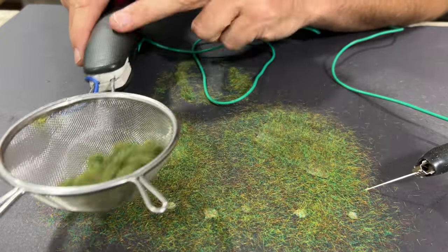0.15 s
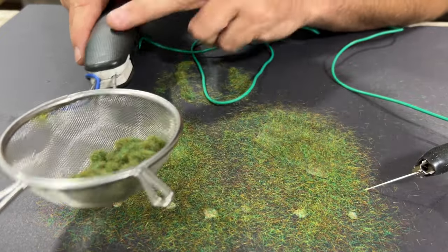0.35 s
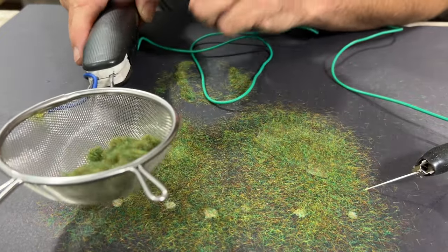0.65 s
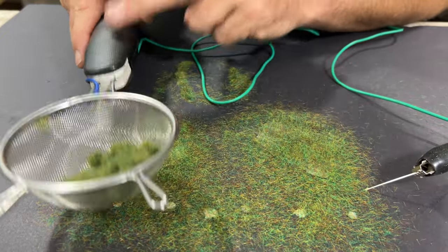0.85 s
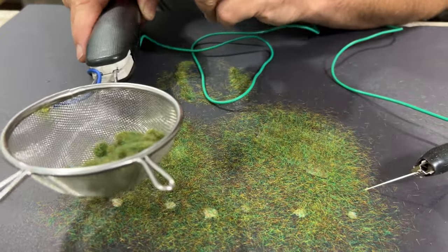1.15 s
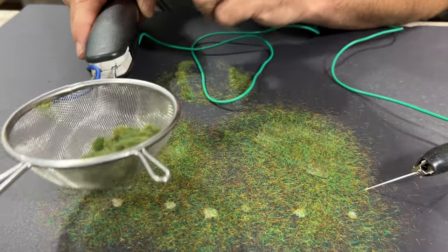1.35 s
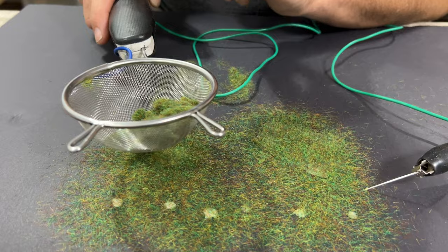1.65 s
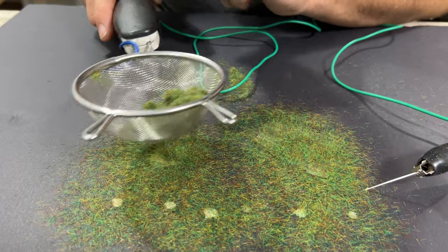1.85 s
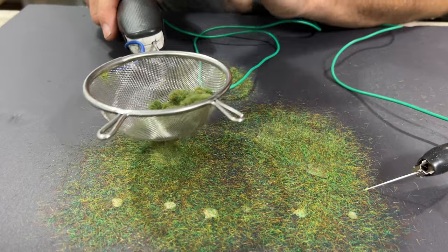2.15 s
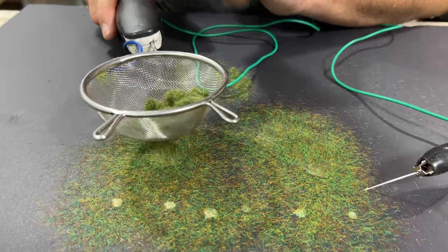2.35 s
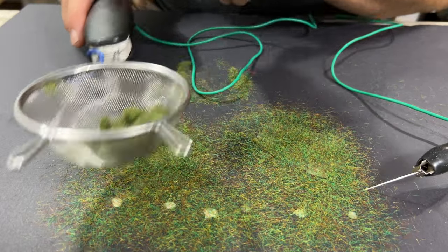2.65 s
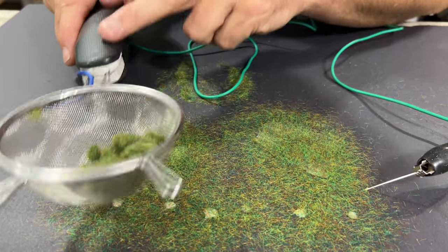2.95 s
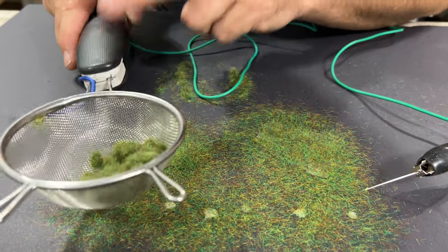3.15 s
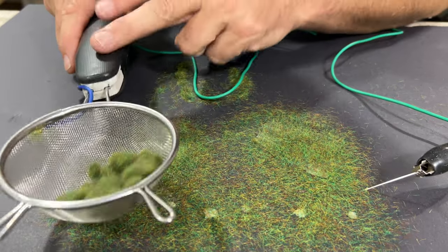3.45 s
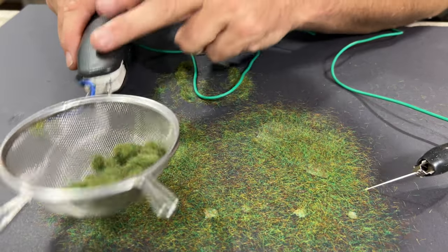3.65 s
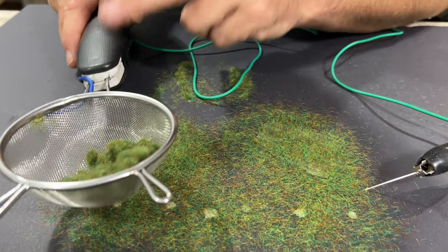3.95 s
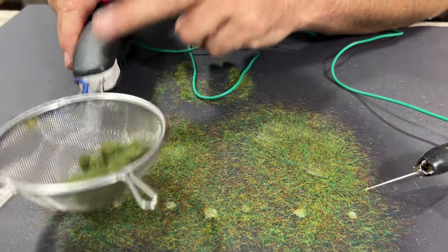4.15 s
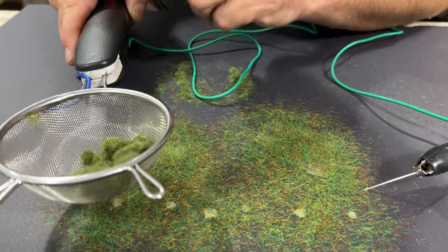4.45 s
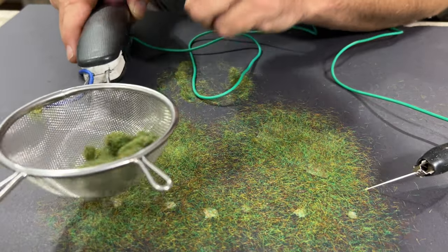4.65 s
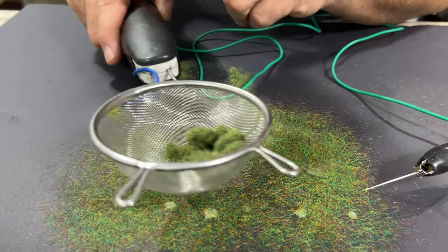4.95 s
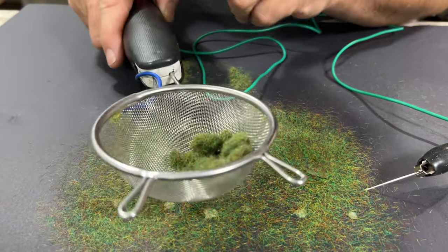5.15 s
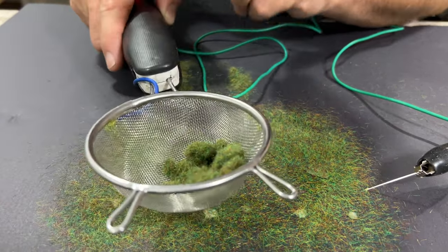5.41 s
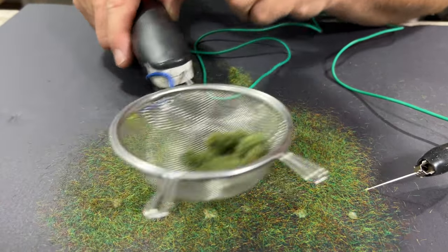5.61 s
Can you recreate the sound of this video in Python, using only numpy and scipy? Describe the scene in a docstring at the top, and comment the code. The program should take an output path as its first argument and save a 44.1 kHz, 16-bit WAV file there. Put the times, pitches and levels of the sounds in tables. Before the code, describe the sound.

Close up in a small room with low rumble and faint hum, fibres scratch briefly over wire mesh and a grip scuffs. Fingers then tap a strainer's handle about five times a second, each tap a bright click with a dull knock and soft low boom, often answered by a plastic clack. Pauses bring fibre slides, then tapping resumes, more tightly paired with clacks, and ends with a strong swish and a few sparser taps.

```python
"""Fibres slide and scratch over a wire mesh first, above low room rumble, a faint hum and a whine.
Then a scuff, and finger taps on the handle of a mesh strainer full of model-grass fibres, over a workbench.
Each tap mixes a bright noise snap, a rim ping, a body-ringing knock and a late low boom of the bench.
Decaying modes make the handle clack back; stray wire ticks are short noise bursts.
Each tap or clack jolts fibres loose: grainy noise rubs and hisses, and swells again in separate slides."""
import sys
import numpy as np
from scipy import signal
from scipy.fft import rfft, irfft, next_fast_len
from scipy.io import wavfile
from scipy.ndimage import map_coordinates

SR = 44100
rng = np.random.default_rng(int(sys.argv[2]) if len(sys.argv) > 2 else 0)


def to_wav(s):
    """Save 16-bit WAV."""
    ch = np.atleast_2d(s).T  # columns
    pcm = np.round(np.clip(ch, -1, 1) * 32767)  # PCM
    wavfile.write(sys.argv[1], SR, pcm.astype(np.int16))


N = 254898  # length in samples

# Spectrum of the low room rumble: pitch_hz, level_db (relative, per Hz)
RUMBLE_SPECTRUM = [(15, -31), (35, 1.5), (48, -0.5), (64, 0.5), (100, 0.5), (135, -4), (200, -11),
                   (400, -21.5), (700, -35), (1500, -36), (4000, -56.5), (16000, -43)]
# Mains hum and electronic whine: pitch_hz, level_db (rms), phase_wander_rad
HUM_TONES = [(119.9, -62, 0.44), (13797, -76, 2.5)]
# Room decay: pitch_hz, t60_s
ROOM_DECAY = [(150, 0.41), (600, 0.23), (2000, 0.31), (5000, 0.34), (14000, 0.26)]
# Likeness of left and right: pitch_hz, likeness (0 unrelated to 1 identical)
STEREO_LIKENESS = [(60, 0.98), (130, 0.73), (300, 0.74), (700, 0.038), (2000, 0.048), (4000, 0.28),
                   (5800, 0.079), (7500, 0.72), (10000, 1), (11500, 1), (13500, 0.8), (15500, .75)]
# Phase by which left leads right: pitch_hz, lead_rad
LEFT_LEAD = [(500, 0), (3000, .7), (5000, .8), (6900, 0), (8200, -1.1), (10100, -3.14), (13400, -6.28),
             (14300, -6.8), (15800, -8.5)]
# Resonances of strainer and handle: pitch_hz, width_hz, level_db (over the plain sound)
BODY_RESONANCES = [(355, 110, -8.5), (489, 23, -6.5), (535, 15, -5), (720, 22, 6.5), (825, 10, 3),
                   (963, 41, 3.5), (1064, 15.6, 7), (1220, 15, -8), (1335, 29, -2), (1640, 8.3, -31),
                   (2510, 110, -0.5), (3460, 52, 1), (3700, 15, 4), (4450, 23, -9), (5300, 15, 7)]

# Scuffs as the grip shifts on the handle: crest_s, rise_s, level_db
SCUFFS_ON_HANDLE = [(.14, 0.033, -52.5), (0.228, 0.016, -34.5)]
# Colouring of the scuffs: pitch_hz, level_db (relative, per Hz)
SCUFF_SPECTRUM = [(100, 0), (280, -7), (480, 1.5), (700, -10.5), (1150, 0), (1900, -3), (3000, -8),
                  (3900, -4), (6000, -5), (8500, -14), (11000, -27), (16000, -27)]
# Fibre clumps scratching over the wire: crest_s, half_length_s, level_db
CLUMP_SCRATCHES = [(0.029, 0.0099, -59), (2.585, 0.015, -52.5), (2.669, 0.011, -55), (4.706, 0.0096, -55),
                   (4.761, .016, -50), (4.802, 0.024, -46), (4.857, 0.027, -54), (5.665, 0.024, -57)]
# Colouring of the scratches: pitch_hz, level_db (relative, per Hz)
SCRATCH_SPECTRUM = [(1000, -30), (2200, -25), (2480, 2.5), (2900, -14), (3700, 2), (4500, 6), (5200, -26),
                    (8000, -1), (12000, -36)]
# Fibres sliding as the sieve tilts: crest_s, rise_s, fall_s, rub_db, hiss_db
FIBRE_SLIDES = [(.035, 0.042, 0.051, -55.5, -63), (1.47, 0.095, 0.14, -59.5, -59),
                (1.70, 0.079, 0.06, -53.5, -49), (2.555, 0.062, 0.14, -52.5, -55),
                (2.88, 0.068, 0.08, -58.5, -55), (2.939, 0.04, 0.044, -52.5, -64),
                (3.57, .04, 0.022, -74, -64), (4.801, 0.047, 0.092, -46, -51),
                (4.89, 0.075, 0.11, -50.5, -48), (5.13, 0.028, 0.048, -57, -64),
                (5.31, 0.018, 0.018, -62, -73), (5.67, 0.038, 0.13, -49.5, -50)]
# Colouring of fibres rubbing on the mesh: pitch_hz, level_db (relative, per Hz)
RUB_SPECTRUM = [(100, -34), (300, -2), (520, 1.5), (900, -6.5), (1500, -9), (2100, -2.5), (2480, -5),
                (3000, -3), (3750, -0.5), (4500, 1.5), (6000, -5), (8500, -5), (12000, -24)]
# Colouring of the fine fibre hiss: pitch_hz, level_db (relative, per Hz)
HISS_SPECTRUM = [(1500, -9), (4000, -19.5), (6500, -3.5), (8500, -3), (11500, 2), (13500, -1), (16000, -5)]

# Stray ticks of the wire: start_s, level_db (near the dry peak)
WIRE_TICKS = [(.0495, -44), (0.278, -41), (0.9402, -34.5), (1.0025, -38.5), (1.229, -42.5), (1.902, -39),
              (2.117, -43.5), (2.382, -38.5), (2.529, -26.5), (3.1153, -51), (4.2512, -41.5), (4.537, -45),
              (4.7455, -35.5), (5.3616, -43)]
# Spectrum of a bright dry contact: pitch_hz, level_db (relative, per Hz)
SNAP_SPECTRUM = [(500, -14), (2000, -11), (4000, -2.5), (7000, -1), (10000, 8.5), (13000, 3.5),
                 (16000, 3.5)]
# Modes of the steel rim: pitch_hz, level_db (relative), t60_s
RIM_MODES = [(8000, 0, .005), (13200, -15, .003)]
# The handle clacking back: start_s, level_db (dry peak of the plastic clack)
HANDLE_CLACKS = [(.2386, -29.5), (0.3813, -26.5), (0.8285, -37.5), (0.9108, -27), (1.0495, -28),
                 (1.2662, -31), (2.3027, -26.5), (2.8377, -44), (3.0608, -33), (3.2855, -43),
                 (3.523, -39.5), (3.7531, -30), (3.9778, -30), (4.1943, -30), (4.4179, -32),
                 (4.6415, -27.5), (4.705, -38.5)]
# Modes of the plastic clack: pitch_hz, level_db (relative), t60_s
PLASTIC_MODES = [(2470, -10, 0.0088), (3865, 2, 0.0058), (4393, 2, 0.0053), (5790, -1.5, 0.0023)]
# Spectrum of the hollow rattle: pitch_hz, level_db (relative, per Hz)
RATTLE_SPECTRUM = [(100, -9), (400, 7.5), (900, 3), (1500, -3), (2200, -5), (4000, -6), (6000, -11.5),
                   (9000, -12.5), (16000, -14.5)]
# Finger taps: start_s, snap_db, ping_db, knock_db, boom_db
FINGER_TAPS = [(0.149, -37.5, -51.5, -52, -33.5), (.37, -34.5, -52.5, -57, -40.5),
               (.5855, -37.5, -49, -54, -37), (0.8041, -35, -60.5, -47, -31.5),
               (1.0326, -41, -56.5, -52, -33), (1.249, -34, -59, -48, -31.5),
               (1.7707, -30.5, -53, -48.5, -35), (1.9821, -31, -36.5, -45, -32),
               (2.2085, -29, -30, -45, -32.5), (2.42, -30, -31, -50.5, -32), (3.0394, -43, -62.5, -66, -68),
               (3.2036, -41.5, -48, -58.5, -56), (3.4422, -34.5, -64.5, -53, -42.5),
               (3.6666, -33, -62, -53, -42), (3.8844, -34, -62.5, -49.5, -36.5),
               (4.1081, -35.5, -65, -54.5, -36), (4.3282, -37.5, -67, -55.5, -37),
               (4.5529, -38.5, -59, -53, -37.5), (5.042, -33, -58, -55, -51), (5.095, -57, -51, -62, -39.5),
               (5.2626, -34.5, -48, -53.5, -41), (5.5088, -28.5, -46, -49.5, -38.5)]
# Spectrum of the handle knock: pitch_hz, level_db (relative, per Hz)
KNOCK_SPECTRUM = [(60, -12), (180, 0.5), (330, 4.5), (550, 4), (850, -10.5), (1300, -8.5), (1900, -9.5),
                  (3500, -20.5), (8000, -25.5), (16000, -15)]

TOP_HZ = 15850  # upper band limit
SCUFF_FADE_DB_PER_S = 192
SWELL_SHAPE = 2.18  # 2 is a bell curve; lower gives longer skirts
REST_RUB_DB, REST_HISS_DB = -74.5, -70  # the trickle in between
JOLT_RISE_S, JOLT_RUB_DB, JOLT_HISS_DB = 0.01, -67, -63.5  # fibres jolted loose by one blow
RUB_FADE_DB_PER_S, HISS_FADE_DB_PER_S = 102, 30.5  # hiss sifts on longer than rub
EDGE_DB, RIM_DB, RATTLE_DB = -6.5, -14.5, -18  # relative to their clack
THUD_DB = -11  # the bench's upper mode, relative to its boom


def amp(db):
    """Decibels to gain."""
    return 10 ** (np.asarray(db) / 20)


def unit(x):
    """Scale to rms 1."""
    return x / np.sqrt(np.mean(x ** 2) + 1e-20)


def along(points, hz):
    """Read a curve of (Hz, value) points on a log frequency axis."""
    point_hz, values = np.transpose(points)
    return np.interp(np.log(hz + 1), np.log(point_hz + 1), values)


def wobble(rate):
    """A smooth random curve with rate knots a second."""
    knots = rng.standard_normal(int(N * rate / SR) + 4)
    return map_coordinates(knots, [np.arange(N) * rate / SR])


def filtered(x, response):
    """Shape a sound by a function of frequency."""
    n = x.shape[-1]
    padded = next_fast_len(n + 4096)
    spectrum = rfft(x, padded) * response(np.fft.rfftfreq(padded, 1 / SR))
    return irfft(spectrum, padded)[..., :n]


def coloured(x, spectrum):
    """Equalise a sound by a spectrum table, then set it to rms 1."""
    return unit(filtered(x, lambda hz: amp(along(spectrum, hz))))


def spread(pair):
    """Blend two unrelated signals into a partly alike left and right."""
    def shares(hz):
        turn = np.arccos(np.clip(along(STEREO_LIKENESS, hz), -1, 1)) / 2
        return np.array([np.cos(turn), np.sin(turn)])

    common, apart = filtered(pair, shares)
    return np.array([common + apart, common - apart])


def add(track, s, sound):
    """Mix a sound into a track at a time in seconds."""
    part = track[..., max(round(s * SR), 0):][..., :sound.shape[-1]]
    part += sound[..., :part.shape[-1]]


def swell(s, rise, fall):
    """A rounded swell of height 1 with its crest at s."""
    t = np.arange(N) / SR - s
    return np.exp(-np.abs(t / np.where(t < 0, rise, fall)) ** SWELL_SHAPE)


def surge(s, rise, fade_db_per_s):
    """A quick rise to 1 at s, then a steady fade in decibels."""
    t = np.arange(N) / SR - s
    return np.exp(-(np.minimum(t, 0) / rise) ** 2) * amp(-fade_db_per_s * np.maximum(t, 0))


def burst(spectrum, attack, t60):
    """Half a second of coloured noise with a fast onset and an exponential decay."""
    t = np.arange(SR // 2) / SR
    noise = coloured(rng.standard_normal(len(t)), spectrum)
    return noise * amp(-60 * t / t60) * (1 - np.exp(-t / attack))


def ring(modes, attack, scatter_db, detune):
    """One blow on decaying sine modes, with strengths and pitches drawn anew; peak 1."""
    t = np.arange(SR // 2) / SR
    sound = np.zeros(len(t))
    for hz, db, t60 in modes:
        decay = amp(db + scatter_db * rng.normal() - 60 * t / t60)
        sound += decay * np.sin(2 * np.pi * hz * (1 + detune * rng.normal()) * t)
    sound = sound * (1 - np.exp(-(t / attack) ** 2))
    return sound / np.abs(sound).max()


def in_room(sound, wet_db):
    """Give a short sound its own stereo tail of noise, decaying at a different pace in each band."""
    noise = rng.standard_normal((2, SR // 2))
    hz, t, bands = signal.stft(noise, SR, nperseg=256)
    decay = amp(-60 * t / along(ROOM_DECAY, hz)[:, None])
    tail = spread(signal.istft(bands * decay, SR, nperseg=256)[1])
    tail = tail / np.linalg.norm(tail[0])
    wet = signal.fftconvolve(sound[None], tail, axes=1)[:, :len(sound)]
    return sound + amp(wet_db) * wet


def grains(rate, size_db, smooth):
    """Stereo crackle: random tiny contacts of uneven size over a smooth share of noise."""
    sizes = amp(size_db * rng.uniform(-0.47, 1, N))
    contacts = (rng.random(N) < rate / SR) * sizes
    crackle = unit(contacts * rng.standard_normal((2, N)))
    return spread(crackle + smooth * rng.standard_normal((2, N)))


def body(hz):
    """The strainer passes every frequency and adds its resonances on top."""
    response = 1
    for centre, width, db in BODY_RESONANCES:
        damping = 1j * hz * width
        response = response + amp(db) * damping / (centre * centre - hz * hz + damping)
    return response


def background():
    """Gently wavering low-room noise under two sine tones of wandering phase."""
    t = np.arange(N) / SR
    noise = spread(rng.standard_normal((2, N)))
    bed = amp(-50.5 + 1.5 * wobble(5.3)) * coloured(noise, RUMBLE_SPECTRUM)
    for hz, db, wander in HUM_TONES:
        bed = bed + amp(db) * np.sqrt(2) * np.sin(2 * np.pi * hz * t + wander * wobble(20))
    return bed


def scuff():
    """The grip scrapes the handle: coarse grit rings the body and follows short surges."""
    pressure = sum(amp(db) * surge(s, rise, SCUFF_FADE_DB_PER_S) for s, rise, db in SCUFFS_ON_HANDLE)
    grit = filtered(grains(rate=2500, size_db=7, smooth=1.0), body)
    return pressure * amp(1.2 * wobble(126.3)) * coloured(grit, SCUFF_SPECTRUM)


def scratches():
    """Clumps catch and slip on the weave: flickering grit rings the body in little surges."""
    t = np.arange(N) / SR
    pressure = sum(amp(db) * np.exp(-((t - s) / half) ** 2) for s, half, db in CLUMP_SCRATCHES)
    catching = amp(2.5 * wobble(160))
    grit = filtered(grains(rate=1500, size_db=1, smooth=0.21), body)
    return pressure * catching * coloured(grit, SCRATCH_SPECTRUM)


def jolted(fade_db_per_s):
    """Summed power of fibres set moving by all taps and clacks; each fresh jolt peaks at 1."""
    power = np.zeros(N)
    one = surge(JOLT_RISE_S, JOLT_RISE_S, fade_db_per_s) ** 2
    for s, *_ in FINGER_TAPS + HANDLE_CLACKS:
        add(power, s, one)
    return power


def fibres():
    """Tiny contacts rub the ringing mesh and hiss through it; trickle, jolts and slides add in power."""
    rub_power = amp(REST_RUB_DB) ** 2 + amp(JOLT_RUB_DB) ** 2 * jolted(RUB_FADE_DB_PER_S)
    hiss_power = amp(REST_HISS_DB) ** 2 + amp(JOLT_HISS_DB) ** 2 * jolted(HISS_FADE_DB_PER_S)
    for s, rise, fall, rub_db, hiss_db in FIBRE_SLIDES:
        flow = swell(s, rise, fall)
        rub_power = rub_power + (amp(rub_db) * flow) ** 2
        hiss_power = hiss_power + (amp(hiss_db) * flow) ** 2
    rubbing = filtered(grains(rate=5000, size_db=8, smooth=1.0), body)
    rub = np.sqrt(rub_power) * amp(1.7 * wobble(70)) * coloured(rubbing, RUB_SPECTRUM)
    sifting = grains(rate=2300, size_db=3, smooth=1.0)
    hiss = np.sqrt(hiss_power) * amp(2.0 * wobble(53)) * coloured(sifting, HISS_SPECTRUM)
    return rub + hiss


def snap(t60):
    """A dry, bright contact: a noise burst that peaks near 1."""
    sound = burst(SNAP_SPECTRUM, attack=0.00062, t60=t60)
    return sound / (2.31 * np.std(sound[:SR // 700]))


def wire_ticks():
    """The rim and wire loops tick as the sieve moves: lone bright snaps in the room."""
    out = np.zeros((2, N))
    for s, db in WIRE_TICKS:
        add(out, s, in_room(amp(db) * snap(t60=0.016), wet_db=-4))
    return out


def rim_ping():
    """The steel rim pings on two short, high modes."""
    return ring(RIM_MODES, attack=.0006, scatter_db=1.5, detune=.012)


def plastic_clack():
    """Plastic meets plastic: short modes, struck nearly the same way each time."""
    return ring(PLASTIC_MODES, attack=.0006, scatter_db=1, detune=.012)


def knock(spectrum, t60, ring_db):
    """A brief noise rattle rings the body; scaled to rms 1 over the first 10 ms."""
    rattle = burst(spectrum, attack=0.00072, t60=t60)
    sound = filtered(rattle, lambda hz: 1 + amp(ring_db) * (body(hz) - 1))
    return sound / np.std(sound[:SR // 100])


def clacks():
    """The handle snaps back: a bright edge with a rim ping, a plastic clack and a hollow rattle."""
    out = np.zeros((2, N))
    for s, db in HANDLE_CLACKS:
        edge = amp(db + EDGE_DB) * snap(t60=0.004) + amp(db + RIM_DB) * rim_ping()
        rattle = amp(db + RATTLE_DB) * knock(RATTLE_SPECTRUM, t60=0.053, ring_db=-5.0)
        add(out, s - .0004, in_room(edge, wet_db=-23.0))
        add(out, s, in_room(amp(db) * plastic_clack(), wet_db=-9.5))
        add(out, s + 0.001027, in_room(rattle, wet_db=2.5))
    return out


def boom(hz, crest, rise, fall):
    """A low bench mode swells to a crest some time after the tap, then dies in a few cycles."""
    t = np.arange(SR // 2) / SR - crest
    envelope = np.exp(-(t / np.where(t < 0, rise, fall)) ** 2)
    return envelope * np.cos(2 * np.pi * hz * (1 + 0.015 * rng.normal()) * t)


def taps():
    """Each tap snaps and pings, then knocks the handle; the bench's thud and boom build up last."""
    out = np.zeros((2, N))
    for s, snap_db, ping_db, knock_db, boom_db in FINGER_TAPS:
        handle = amp(knock_db) * knock(KNOCK_SPECTRUM, t60=0.1, ring_db=-6.0)
        low = amp(boom_db) * boom(hz=64.8, crest=0.0297, rise=0.0081, fall=0.047)
        thud = amp(boom_db + THUD_DB) * boom(hz=141, crest=0.0295, rise=0.0056, fall=0.0043)
        add(out, s, in_room(amp(snap_db) * snap(t60=0.0062), wet_db=-1.5))
        add(out, s, in_room(amp(ping_db) * rim_ping(), wet_db=-12.0))
        add(out, s + .003, in_room(handle, wet_db=1))
        add(out, s, low)  # the boom stays dry and central
        add(out, s, in_room(thud, wet_db=1.0))
    return out


def scene():
    """Everything that sounds around the bench, from the background to the taps."""
    return background() + scuff() + scratches() + fibres() + wire_ticks() + clacks() + taps()


def record(dry):
    """Treble reaches the two microphone ports out of step; a steep low-pass ends the band."""
    def response(hz):
        half_lead = .5j * along(LEFT_LEAD, hz) * np.array([[1], [-1]])
        return np.exp(half_lead) / np.sqrt(1 + (hz / TOP_HZ) ** 300)

    return filtered(dry, response)


dry = scene()
out = record(dry)
to_wav(out)
```